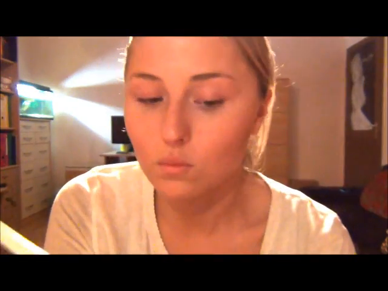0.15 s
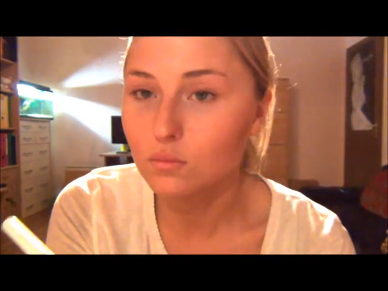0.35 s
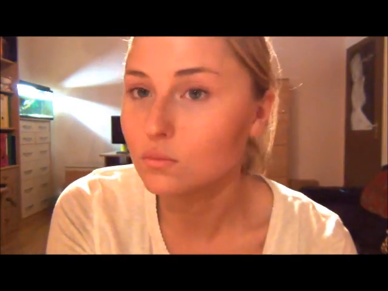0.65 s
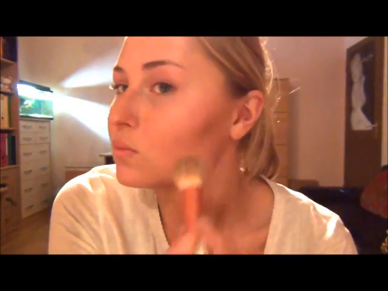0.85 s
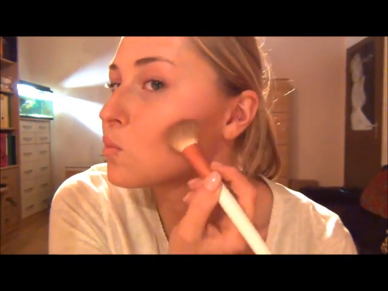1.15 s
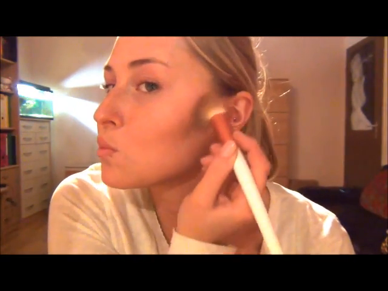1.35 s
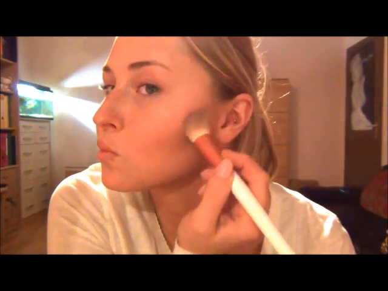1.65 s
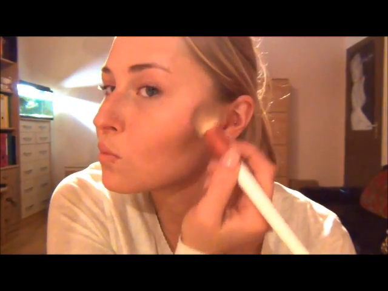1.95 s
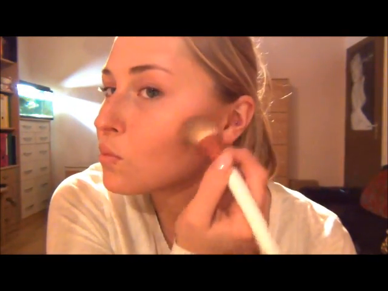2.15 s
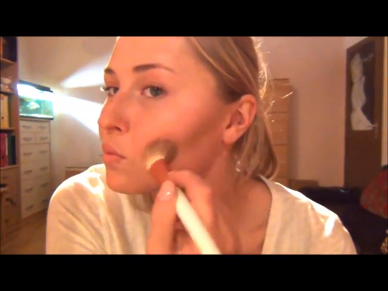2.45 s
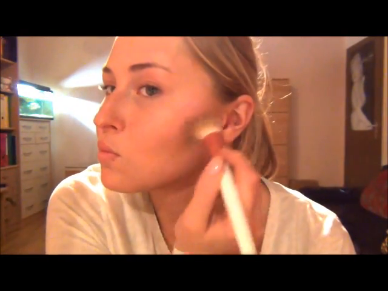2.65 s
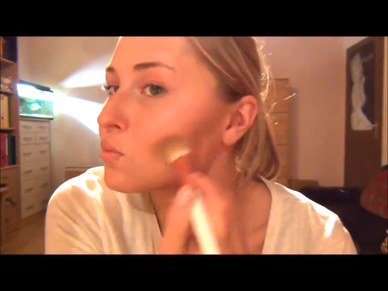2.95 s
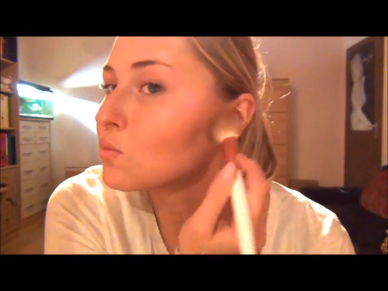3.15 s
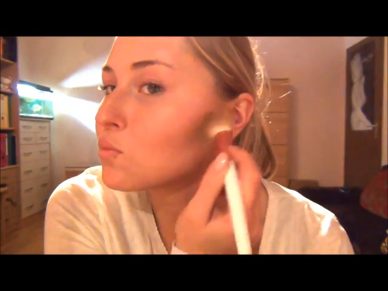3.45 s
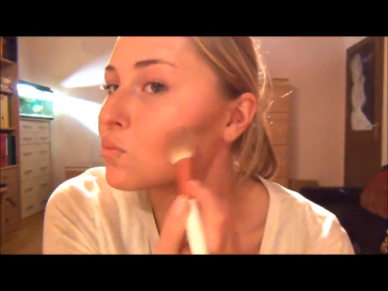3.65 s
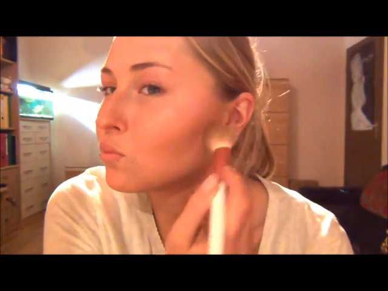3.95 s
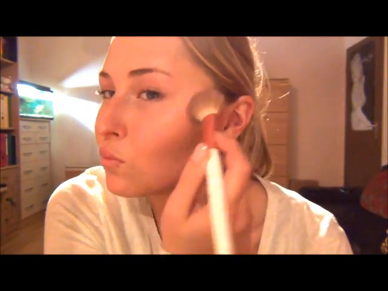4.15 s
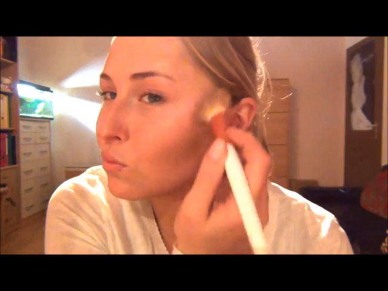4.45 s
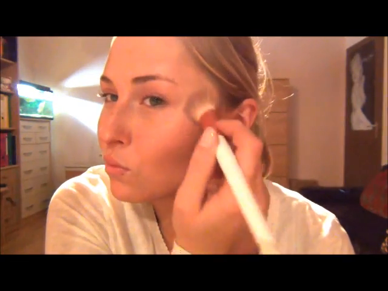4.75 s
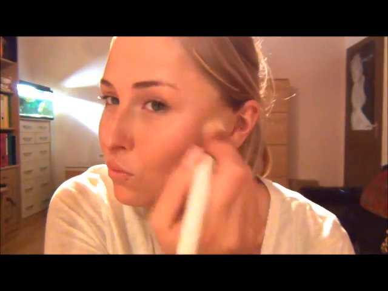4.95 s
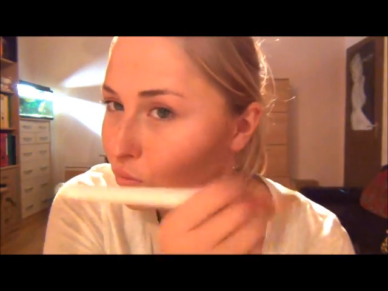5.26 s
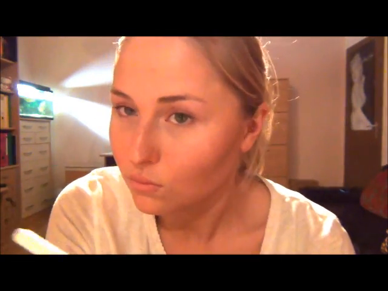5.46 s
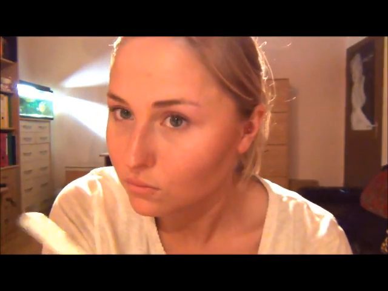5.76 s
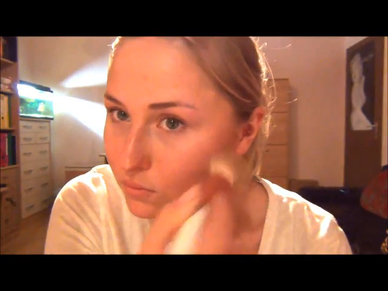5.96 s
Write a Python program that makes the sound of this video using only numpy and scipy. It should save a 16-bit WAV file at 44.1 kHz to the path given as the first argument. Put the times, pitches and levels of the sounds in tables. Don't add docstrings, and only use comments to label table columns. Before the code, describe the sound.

Close stereo pickup in a small quiet room with a constant low pump and fan drone, mains hum and faint high whistle. Bristles scratch briefly in a powder pan with tiny ticks, then a loud sharp plastic clack with rapid bounces. The background dips and slowly returns while soft, airy brush strokes pass over a cheek. Near the end the brush flicks and ticks at the pan again.

```python
import sys
import numpy as np
from scipy import signal
from scipy.fft import rfft, irfft
from scipy.io import wavfile

SR = 44100
rng = np.random.default_rng(int(sys.argv[2]) if len(sys.argv) > 2 else 0)


def unload_wav(signal):
    wavfile.write(
        sys.argv[1],
        SR,
        np.round(np.clip(np.atleast_2d(signal).T, -1, 1) * 32767).astype(np.int16),
    )


def rack_gain(trim_db):
    fader = np.asarray(trim_db, float)
    return 10 ** (fader / 20)


N = 268549

# f/Hz, density/dB per Hz
AIR_SPECTRUM = [(25, -17), (45, -16), (70, -15), (130, -13.5), (170, -11), (250, -4), (350, -12),
                (700, -14.5), (1450, -16), (2500, -19.5), (4150, -22.5), (7500, -24), (11000, -23.5),
                (15500, -24)]
# f/Hz, width/Hz, level/dB rms
HOUSING_HUMPS = [(199.6, 8.2, -63.5), (221.4, 9.8, -62), (253.4, 9.9, -63.5), (302, 24, -67),
                 (613.6, 89, -65.5), (863.6, 100, -58.5), (1241, 120, -64.5), (1648, 61, -71)]
# f/Hz, level/dB rms
STEADY_TONES = [(99.8, -65.5), (50.7, -78.5), (15625, -68.5), (15675, -79), (15575, -82), (15725, -85),
                (15525, -79)]
# f/Hz, side minus mid/dB
DRONE_WIDTH = [(60, -32), (110, -15.5), (200, -29), (380, -9), (700, -11), (1290, -6.5), (2380, -5),
               (4400, -5.5), (8120, -8.5), (15000, -10.5)]

# f/Hz, T60/s
ROOM_T60 = [(1000, 0.36), (3000, 0.36), (7500, 0.31), (11000, 0.29), (15000, .12)]
# f/Hz, density/dB per Hz
KNOCK_OFF_WALLS = [(350, -52), (600, -11), (832, -16), (902, -18), (979, -13.5), (2540, -5.5), (5900, -7.5),
                   (7040, -4), (15500, -13.5)]

# t/s, peak level/dB
KNOCKS = [
    (0.9739, -5),
    (0.9861, -9),
    (0.992, -17),
    (0.998, -38),
    (.9990, -42),
]
# f/Hz, level/dB
CASE_MODES = [(800, -18.5), (1330, -16), (2200, -6.5), (2900, -6.5), (4000, -4.5), (5000, 0), (5550, -3.5),
              (6850, 1.5), (7450, -1), (8350, -4), (9300, -3), (10600, -11), (11500, -10), (12500, -4),
              (14700, -13), (15600, -16)]
# f/Hz, level/dB, T60/s
LINGERING_MODES = [(327, -54, .06), (497, -48.5, 0.052), (2500, -48, .2), (2680, -43, 0.23),
                   (2760, -56, .2), (6850, -51, .35), (6900, -48, .35), (7100, -51, .35), (7175, -50, .35),
                   (7260, -52, .35), (7370, -48, 0.38), (7460, -52, .3)]
# t/s, peak level/dB, f/Hz
RIM_TICKS = [(.5880, -30, 10500), (.5885, -32, 4900), (0.7566, -19, 11800), (0.7615, -26, 9600),
             (3.927, -35, 4500), (5.508, -35, 4520), (5.6416, -13, 10200), (5.67, -33, 7000),
             (5.675, -26, 11100), (5.6795, -31, 11000), (5.8855, -35, 11500), (5.894, -46, 10500),
             (5.905, -24, 10500)]

# t/s, hold/s, bright level/dB, dull against bright/dB, pan ring against bright/dB
SWIRLS = [(.338, .014, -56, -4, -4), (.372, 0.017, -54, -6, 0), (.495, .015, -56.5, -1.5, -9),
          (.525, .03, -55, 0, -11), (.563, 0.024, -45, -8, -2), (.680, 0.017, -53, -2, -12),
          (.718, .028, -51, 1.5, -11), (.756, 0.0025, -32.5, -9, -1.5), (.790, 0.017, -64, 0, -6),
          (5.585, 0.015, -51, -0.5, -12), (5.626, 0.011, -51, 1.5, -12), (5.642, 0.0099, -41.5, -9, -9),
          (5.660, 0.014, -40.5, -3.5, -10), (5.676, 0.012, -38, -6, -8), (5.700, 0.0075, -46.5, -8, -1),
          (5.805, .04, -56.5, 0, -10), (5.855, .025, -52.5, 2, -18), (5.888, 0.019, -39.5, -8, -8)]
# f/Hz, density/dB per Hz
BRIGHT_GRIT = [(5500, -32), (8000, -0.5), (10500, 2.5), (13000, -1), (15000, -1), (16000, -28)]
# f/Hz, density/dB per Hz
DULL_GRIT = [(900, -18), (2000, -1), (3500, -5), (5000, -2), (7000, 1), (9500, -27)]
# f/Hz, width/Hz, level/dB
PAN_MODES = [(4940, 130, -8), (8370, 170, -18), (10400, 280, -6), (12430, 170, 1.5), (14850, 270, -3)]

# t/s, hold/s, tips level/dB, belly against tips/dB
STROKES = [(1.365, 0.039, -62.5, -3), (1.470, .07, -60, 0.5), (1.700, 0.022, -59.5, -5),
           (1.890, .005, -59, -4.5), (2.075, .06, -60, -5), (2.285, 0.018, -61, -8),
           (2.420, 0.019, -53.5, -8), (2.490, 0.035, -64.5, -1), (2.685, .01, -62, -7),
           (2.735, .01, -63, -7), (2.795, 0.018, -59, -3.5), (2.930, 0.04, -60, -7), (3.090, .04, -65, -5),
           (3.160, .04, -58, -2.5), (3.270, 0.091, -64.5, -6), (3.515, 0.053, -54.5, 0.5),
           (3.880, .02, -62, -6), (3.922, .012, -54.5, 3), (3.955, 0.018, -58, -2),
           (4.355, .005, -51, -6.5), (4.645, 0.009, -50.5, -6.5), (4.935, .005, -52.5, -4.5),
           (5.250, .005, -49, -3.5), (6.030, .01, -59.5, -4)]
# t/s, hold/s, tips level/dB, belly against tips/dB
TRAILING = (4, 1, -71, -15)
# t/s, hold/s, tips level/dB, belly against tips/dB
HAIR_CATCH = (5.455, .07, -53.5, -13)
# f/Hz, density/dB per Hz
TIPS_SPECTRUM = [(6500, -16.5), (9000, -7), (11000, 0), (13000, -4), (15500, -13)]
# f/Hz, density/dB per Hz
BELLY_SPECTRUM = [(1600, -5.5), (2700, -10.5), (3600, -0.5), (4600, -3.5), (5200, -11.5), (6100, -3.5),
                  (7200, -15), (9000, -22)]


def rms_one(x):
    return x / np.sqrt(np.mean(x ** 2) + 1e-20)


def at_hz(points, hz):
    points_hz, values = np.transpose(points)
    return np.interp(np.log(hz), np.log(points_hz), values)


def bins_hz():
    return np.arange(1, N // 2 + 2) * SR / N


def coloured(x, spectrum):
    closed = [(spectrum[0][0] / 2, -60), *spectrum, (spectrum[-1][0] * 2, -60)]
    return rms_one(irfft(rfft(x) * rack_gain(at_hz(closed, bins_hz())), N))


def resonate(x, hz, width_hz):
    r = np.exp(-np.pi * width_hz / SR)
    zeros = np.array([1, 0, -1]) * (1 - r * r) / 2
    return signal.lfilter(zeros, [1, -2 * r * np.cos(2 * np.pi * hz / SR), r * r], x)


def ring(clicks, hz, t60):
    r = rack_gain(-60 / (t60 * SR))
    w = 2 * np.pi * hz / SR
    return signal.lfilter([0, np.sin(w)], [1, -2 * r * np.cos(w), r * r], clicks + 1e-18)


def highpass(x, hz):
    return signal.sosfilt(signal.butter(2, hz, "high", fs=SR, output="sos"), x)


def slips(per_s, spread_db):
    sizes = rack_gain(spread_db * np.minimum(rng.exponential(1, N), 5))
    signs = rng.choice([-1, 1], N)
    return rms_one(sizes * signs * (rng.random(N) < per_s / SR))


def touches(rows, rise_db_per_s, fall_db_per_s):
    s, hold, db, *against = np.transpose(rows)[:, :, None]
    t = np.arange(0, N + 32, 32) / SR
    rise = rise_db_per_s * np.maximum(s - t, 0)
    fall = fall_db_per_s * np.maximum(t - s - np.abs(hold), 0)
    shape_db = db - rise - fall
    gains = []
    for offset_db in (0, *against):
        total = np.sqrt(np.sum(rack_gain(shape_db + offset_db) ** 2, axis=0))
        gains.append(np.interp(np.arange(N) / SR, t, total))
    return gains


def placed(x, pan_db, apart):
    echo = apart * np.roll(x, 23)
    return np.array([x + echo, x - echo]) * rack_gain(np.array([[pan_db], [-pan_db]]) / 2)


def gain_control():
    rest_db, duck_db, duck_s, creep_db_per_s = -0.5, 8, 0.03, 2.5
    after = np.arange(N) / SR - KNOCKS[0][0]
    onset = np.clip(after / duck_s, 0, 1)
    return rack_gain(rest_db - onset * np.maximum(duck_db - creep_db_per_s * after, 0))


def drone():
    white = rng.standard_normal((4, N))
    mid, side = rack_gain(-53.0) * np.array([coloured(w, AIR_SPECTRUM) for w in white[:2]])
    for hz, width_hz, db in HOUSING_HUMPS:
        hump = resonate(resonate(white[2:], hz, width_hz), hz, width_hz)
        hump_mid, hump_side = rack_gain(db) * rms_one(hump)
        mid, side = mid + hump_mid, side + hump_side
    side = irfft(rfft(side) * rack_gain(at_hz(DRONE_WIDTH, bins_hz())), N)
    t = np.arange(N) / SR
    for hz, db in STEADY_TONES:
        mid = mid + np.sqrt(2) * rack_gain(db) * np.sin(2 * np.pi * (hz * t + rng.random()))
    return gain_control() * np.array([mid + side, mid - side])


def room(x):
    t = np.arange(SR // 2) / SR
    edges = 500 * 2 ** np.arange(0, 5.1, .5)
    tail = 0
    for low, high in zip(edges, edges[1:]):
        band_filter = signal.butter(2, [low, high], "band", fs=SR, output="sos")
        band = signal.sosfilt(band_filter, rng.standard_normal((2, len(t))))
        tail = tail + band * rack_gain(-60 * t / at_hz(ROOM_T60, np.sqrt(low * high)))
    build_up = np.minimum(t / 0.0015, 1)
    mid, side = tail * build_up / np.sqrt(np.sum(tail[0] ** 2))
    return signal.fftconvolve(x[None], [mid + .5 * side, mid - .5 * side], axes=1)[:, :N]


def contacts():
    s, db = np.transpose(KNOCKS)
    clicks = np.zeros(N)
    clicks[(s * SR).astype(int)] = rack_gain(db)
    return clicks


def lingering():
    modes = enumerate(LINGERING_MODES)
    return sum(rack_gain(db) * (-1) ** k * ring(contacts(), hz, t60) for k, (hz, db, t60) in modes)


def knocks():
    handle_db, handle_s = -10, 0.00068
    ferrule = contacts()
    both = ferrule + rack_gain(handle_db) * np.roll(ferrule, round(handle_s * SR))
    rings = 0
    for k, (hz, db) in enumerate(CASE_MODES):
        t60 = .009 * (5000 / hz) ** .3
        rings = rings + rack_gain(db - 8.0) * (-1) ** k * ring(both, hz, t60)
    return highpass(rings, 600)


def ticks():
    out = np.zeros(N)
    t = np.arange(300) / SR
    for s, db, hz in RIM_TICKS:
        pair = np.sin(2 * np.pi * hz * t) - 0.5 * np.sin(2 * np.pi * 0.46 * hz * t)
        start = int(s * SR)
        out[start:start + len(t)] += rack_gain(db) * pair * np.exp(-t / .00025)
    return highpass(out, 2500)


def cheek():
    rise_db_per_s, catch_rise_db_per_s, fall_db_per_s = 330, 1500, 239
    tips = coloured(slips(14000, 3.2), TIPS_SPECTRUM)
    belly = coloured(slips(9000, 2.7), BELLY_SPECTRUM)
    sweeps = touches([*STROKES, TRAILING], rise_db_per_s, fall_db_per_s)
    catch = touches([HAIR_CATCH], catch_rise_db_per_s, fall_db_per_s)
    tips_gain, belly_gain = np.hypot(sweeps, catch)
    return tips_gain * tips + belly_gain * belly


def pan_swirls():
    rise_db_per_s, fall_db_per_s = 1200, 1204
    grit = slips(9000, 3.3)
    bright, dull = coloured(grit, BRIGHT_GRIT), coloured(grit, DULL_GRIT)
    modes = [rack_gain(db) * rms_one(resonate(grit, hz, width_hz)) for hz, width_hz, db in PAN_MODES]
    metal = rms_one(sum(modes))
    bright_gain, dull_gain, ring_gain = touches(SWIRLS, rise_db_per_s, fall_db_per_s)
    return bright_gain * bright + ring_gain * metal + dull_gain * dull


def scene():
    tick, swirls, strokes = ticks(), pan_swirls(), cheek()
    near = placed(knocks() + lingering() + tick, pan_db=-0.5, apart=0.14)
    near = near + placed(swirls, pan_db=-1.0, apart=0.17)
    near = near + placed(strokes, pan_db=-0.4, apart=0.15)
    radiated = rack_gain(-60.5) * coloured(contacts(), KNOCK_OFF_WALLS)
    radiated = radiated + rack_gain(-20.0) * tick + rack_gain(-24.5) * (swirls + strokes)
    return near + room(radiated) + drone()


def band_limit(x):
    return signal.sosfilt(signal.butter(12, 17090, fs=SR, output="sos"), x)


def record(dry):
    rounded = .8 * np.tanh(dry / .8)
    top_cut = signal.ellip(8, .25, 26, 15790, fs=SR, output="sos")
    mix = signal.sosfiltfilt(top_cut, rounded)
    return band_limit(mix)


dry = scene()
out = record(dry)
unload_wav(out)
```